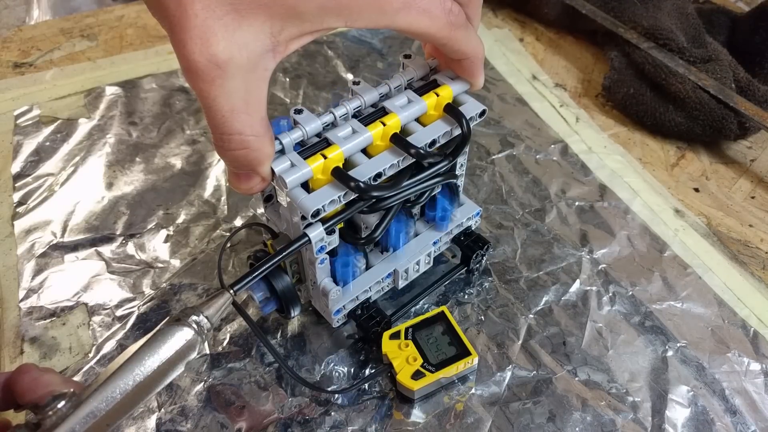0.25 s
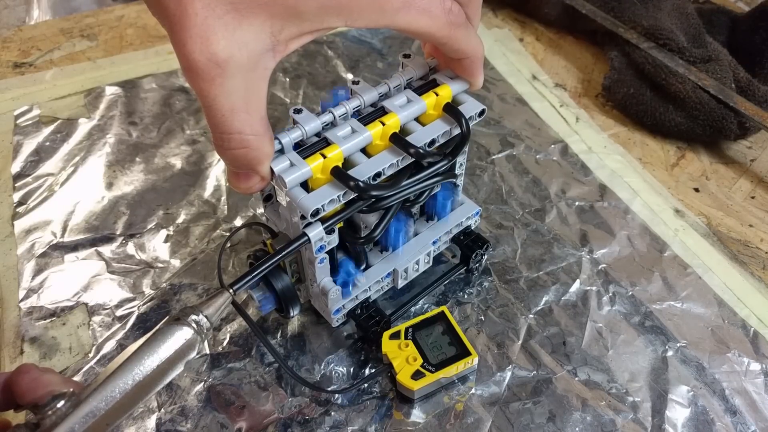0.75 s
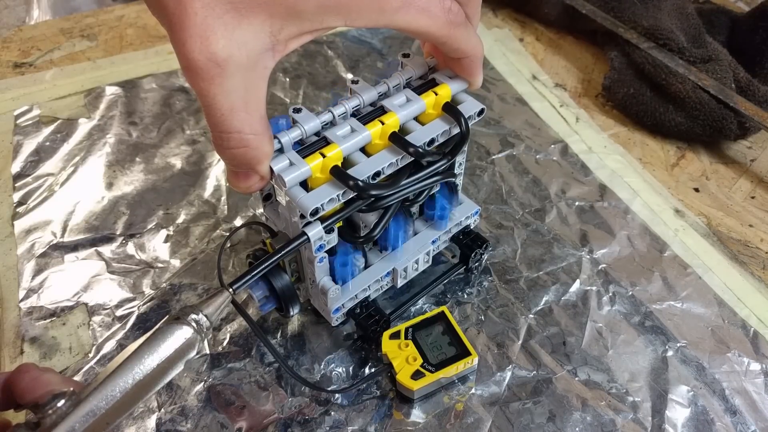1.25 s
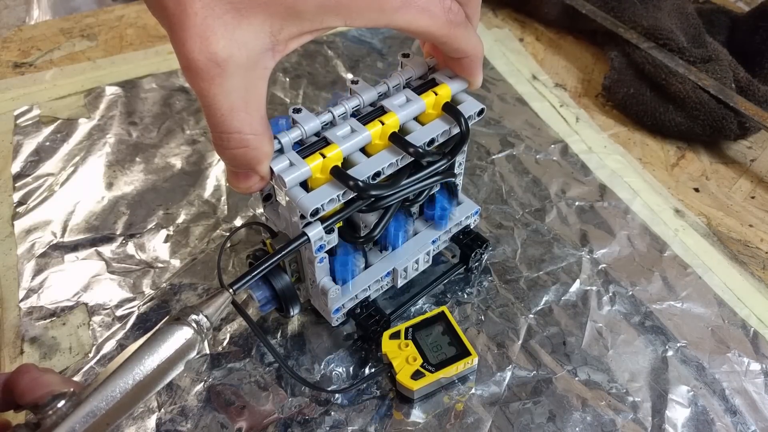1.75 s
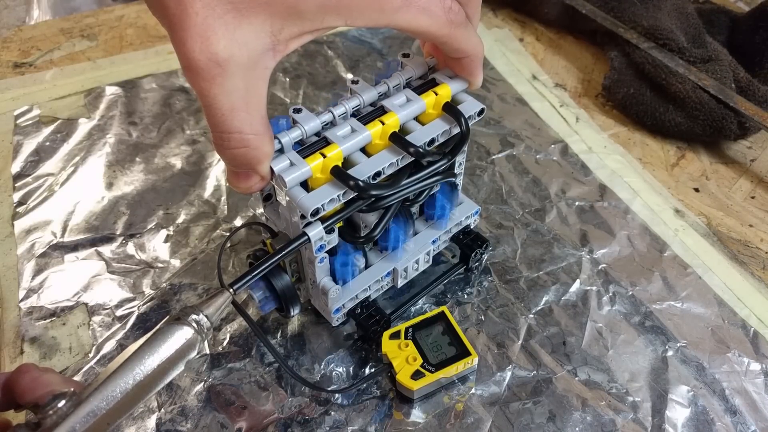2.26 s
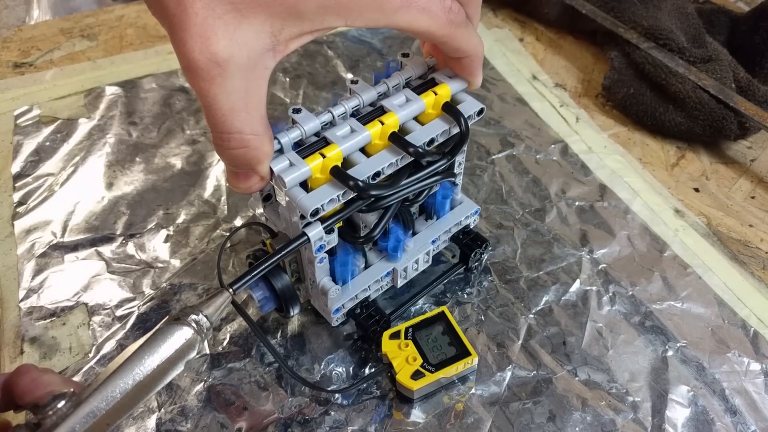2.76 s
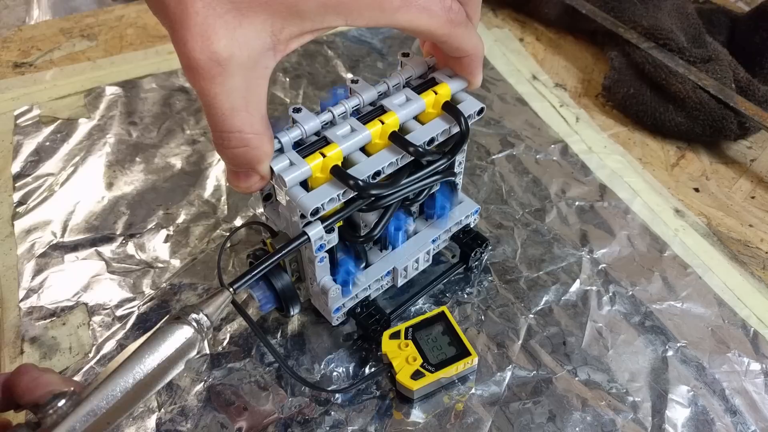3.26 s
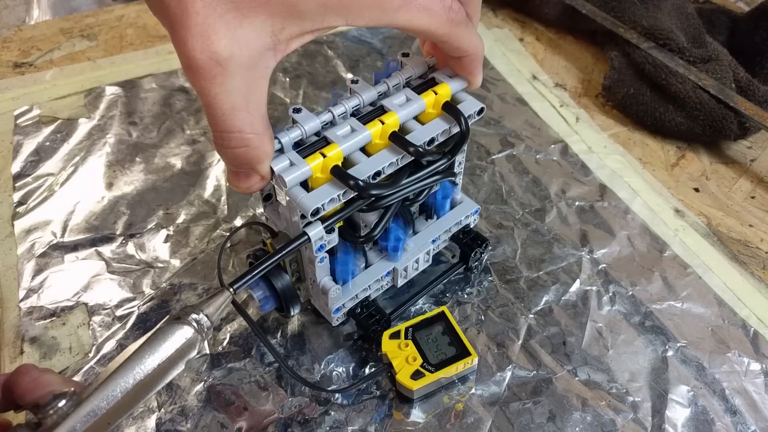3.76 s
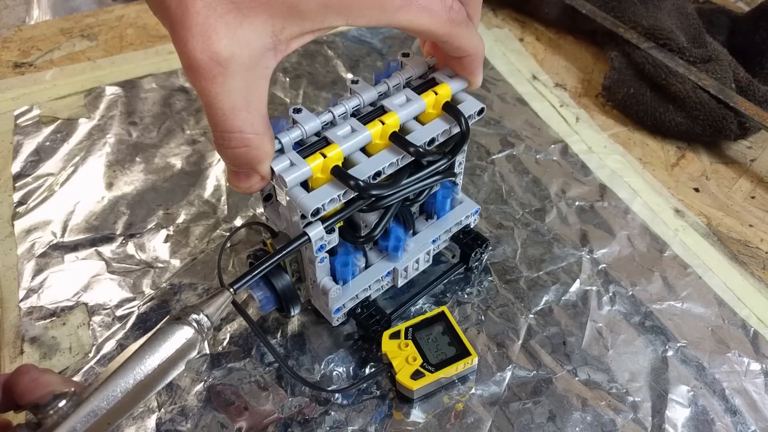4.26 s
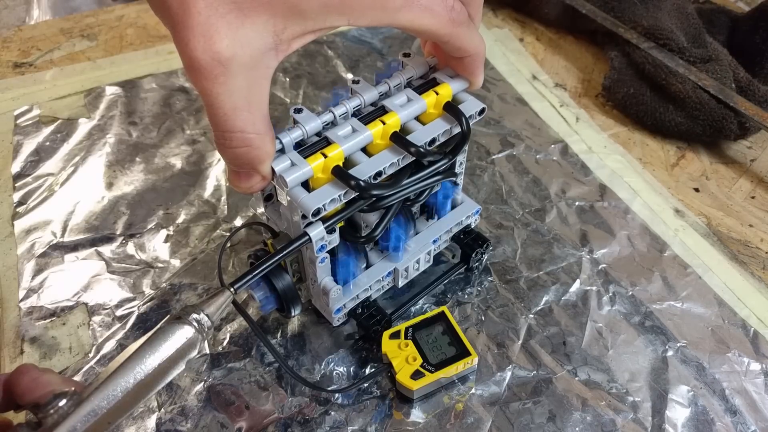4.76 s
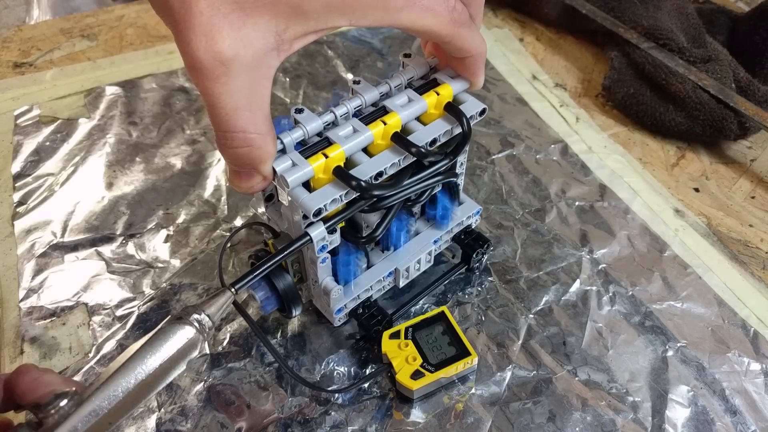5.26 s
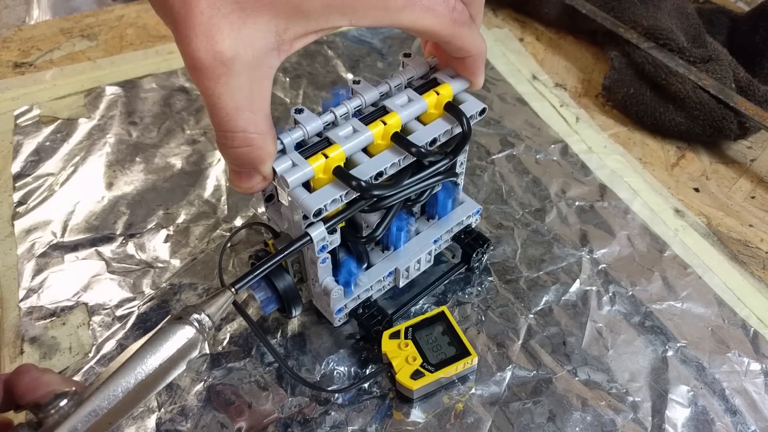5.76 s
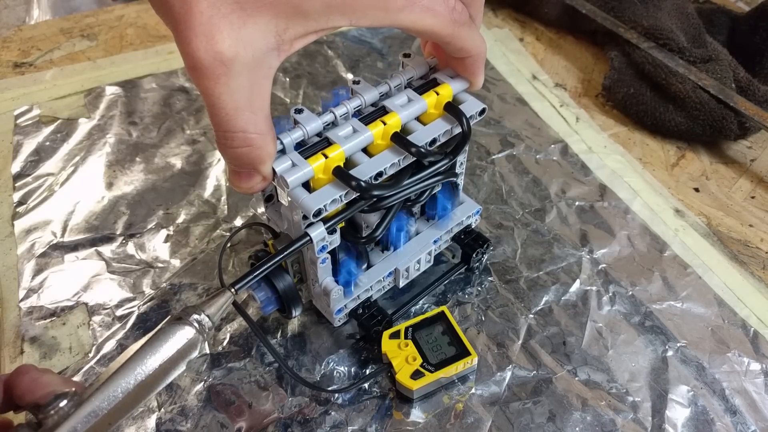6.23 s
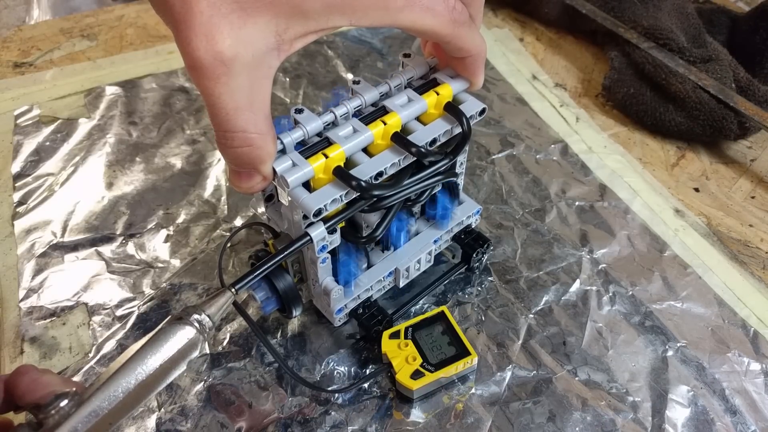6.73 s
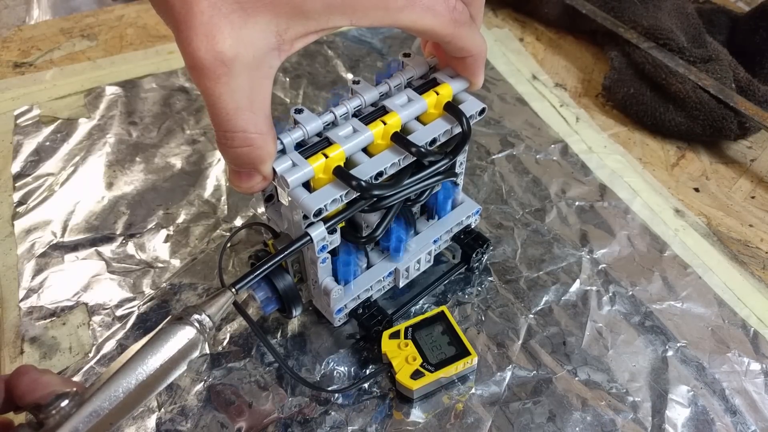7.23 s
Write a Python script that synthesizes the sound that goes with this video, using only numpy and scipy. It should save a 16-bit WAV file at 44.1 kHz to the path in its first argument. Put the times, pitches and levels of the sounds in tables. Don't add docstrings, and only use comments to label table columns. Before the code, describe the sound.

From 0 s a small three-cylinder toy air engine of plastic bricks is already spinning at about 19 turns per second, heard very close on a foil-covered board indoors. Loudest is sharp, gritty compressed-air hiss, strongest around 5 to 7 kHz, chopped into rapid puffs of differing colour, several per turn, so it flutters and whirs. Valve levers tick brightly every turn, and harder snaps jump out irregularly, for example near 0, 1, 1.7, 2.2, 3.2 to 3.5, 4.3 and 5.4 s. Much quieter, rods and cams knock the plastic frame in a fast rattle, and board and frame hum with a wavering low buzz. Speed climbs smoothly to about 21 turns by 3 s, 23 by 5 s and 25 at 7.5 s; hiss grows slightly louder and brighter, partly swallowing the ticks. Short reflections and faint room wash surround it. It ends still running, without slowing.

```python
import sys
import numpy as np
from scipy import signal
from scipy.io import wavfile
from scipy.ndimage import uniform_filter1d

SR = 44100
rng = np.random.default_rng(int(sys.argv[2]) if len(sys.argv) > 2 else 0)


def unload_audio(sound):
    columns = np.transpose(np.atleast_2d(sound))
    steps = np.round(np.clip(columns, -1, 1) * 32767)
    wavfile.write(sys.argv[1], SR, steps.astype(np.int16))


def gain_from_db(level_db):
    decades = np.asarray(level_db, float) / 20
    return 10 ** decades


N = 330309

# time in [s], speed in [turns per s].
CRANK_SPEED = [(0, 18.838), (0.9, 19.419), (1.5, 19.838), (2.1, 20.233), (2.7, 20.489), (3.0, 20.73),
               (3.9, 21.606), (4.5, 22.172), (4.8, 22.714), (5.1, 23.119), (5.4, 23.212), (5.7, 23.431),
               (6.3, 24.054), (7.49, 25.344)]
START_TURN, MID_SPEED = 0.022, 22

# level at MID_SPEED in [dB], rise in [dB per doubling].
AIR_LEVEL = (-17.5, 7.2)
# level at MID_SPEED in [dB], rise in [dB per doubling].
AIR_TREBLE = (-0.5, 2.7)
DULL_START_DB, DULL_START_S = -2, 0.035
# frequency in [Hz], level in [dB per Hz].
JET_COLOUR = [(1120, -58), (1900, -27.5), (2590, -19), (3560, -9.5), (4440, -13.5), (4890, -10),
              (5390, -2.5), (6050, 0.5), (7160, -5), (9670, -19), (11500, -19), (15700, -24)]
# crank angle in [turns], half width in [turns], centre in [Hz],
# level in [dB over the mean].
EXHAUST_PUFFS = [(.089, 0.056, 2000, -1), (.128, 0.044, 9100, 3), (.256, 0.057, 4170, 0.5),
                 (.272, 0.065, 15300, 3.5), (.391, 0.017, 8400, -2), (.448, 0.078, 3290, -2.5),
                 (.473, 0.039, 11700, 0), (.612, .071, 2000, -0.7), (.613, 0.068, 13450, 0.8),
                 (.75, 0.058, 8600, -2), (.794, 0.021, 6410, 2), (.803, 0.085, 3800, -1.8),
                 (.814, 0.073, 14680, -5), (.93, 0.067, 12100, -2), (.962, 0.04, 2380, -2.1)]
PUFF_SPREAD_HZ, LEAK_DB = 4200, -1.5
# crank angle in [turns], centre in [Hz], level in [dB over the mean].
WHISTLING_PORTS = [(.047, 9000, 1), (.055, 15200, 1), (.223, 11950, 7), (.225, 5800, 9), (.31, 2300, -3),
                   (.373, 9000, 0), (.575, 6600, 6), (.575, 13260, -.4), (.125, 11900, 3),
                   (.653, 6600, 1.5), (.689, 7550, 6), (.785, 13500, 4.1)]
PORT_TURNS, PORT_SPREAD = 0.02, 0.064

# crank angle in [turns],
# ring in [Hz], # length in [cycles], level in [dB], angle spread in [turns].
CRANK_TICKS = [
    (.225, 5950, 9, 6, .007),
    (.8, 6500, 7, 5.5, .007),
    (.575, 6500, 7, 3, .008),
    (.24, 3650, 8, -2, .014),
    (.8, 3200, 6, -3.5, .008),
    (.225, 11700, 16, -7, .008),
    (.12, 11600, 20, -10, .02),
    (.14, 1500, 3, -20, .003),
    (.79, 1900, 4, -20, .004),
]
TICK_FADE_DB = -5
# time in [s], level in [dB over the hiss].
HARD_SNAPS = [(0.0107, 12.2), (0.2219, 9.6), (0.5888, 9.7), (0.8992, 10.0), (1.0199, 10.9), (1.7112, 11.8),
              (1.9113, 10.6), (2.0102, 9.8), (2.208, 11.6), (2.3552, 9.5), (2.5028, 10.2), (2.796, 9.9),
              (2.872, 9.5), (3.1505, 9.3), (3.2296, 12.1), (3.2772, 10.4), (3.4197, 11.8), (3.4467, 10.0),
              (3.4669, 9.8), (3.7286, 10.8), (3.775, 9.3), (3.9143, 9.8), (4.0065, 9.8), (4.3463, 11.3),
              (4.687, 10.0), (5.3548, 10.1), (5.4018, 10.2), (5.7409, 9.1), (7.002, 9.5), (7.4797, 10.0)]

# crank angle in [turns], level in [dB].
ROD_KNOCKS = [
    (.055, 1.5),
    (0.141, 5.5),
    (0.25, -19),
    (.33, 4.5),
    (0.421, -10.5),
    (.49, -0.5),
    (0.602, 0.5),
    (0.679, -6),
    (.78, 4),
    (0.918, -2),
]
# level at MID_SPEED in [dB], rise in [dB per doubling].
KNOCK_LEVEL = (-43.5, 5)
# frequency in [Hz], level in [dB per Hz].
BODY_COLOUR = [(150, -24.5), (230, -1.5), (330, -1.5), (410, -15.5), (500, -2.5), (850, 0.5), (1050, -2),
               (1250, -0.5), (1600, 1), (2100, -2.5), (2800, 0), (3600, 5), (4300, 3), (6000, -32)]

# frequency in [Hz], width in [Hz], level in [dB].
BOARD_RESONANCES = [(48.6, 2.9, 11), (56.8, 7.5, 6.5), (76.95, 2.6, 5.5), (97, 2.5, -6), (132.2, 5.6, -1.5),
                    (150.3, 8.6, -2.5), (189.2, 2.8, 0.7), (232, 12.8, 2.5), (245.4, 12.8, 8.5)]
# shaft order in [multiples of crank speed], level in [dB].
BOARD_DRIVE = [(2, -65.1), (3, -39.7), (4, -49.7), (5, -46.8), (6, -38.0), (7, -55.3), (8, -47.0),
               (9, -50.4), (10, -58.9)]
# frequency in [Hz], width in [Hz], level in [dB].
FRAME_RESONANCES = [(273, 12, -10.5), (411, 22.4, -4.5), (445, 32, -6.5), (555.0, 9.9, 0.8),
                    (573, 15, -3.5), (631, 20, -4.5), (726, 17, -3.5), (852, 21, 4.3), (1137, 16, 3),
                    (1254, 19, 5.5), (1390, 27, 2), (1557, 31, 8)]
# shaft order in [multiples of crank speed], level in [dB].
FRAME_DRIVE = [(11, -50.5), (12, -51), (13, -45.5), (14, -49), (16, -47), (17, -50.5), (18, -54),
               (19, -49.5), (20, -52), (21, -50.5), (22, -54), (23, -55), (24, -56), (26, -57), (27, -54),
               (29, -59), (31, -51.5), (32, -51.5), (33, -57), (35, -54), (36, -57.5), (43, -56), (48, -57),
               (50, -58), (51, -56), (55, -60), (56, -58), (58, -60), (64, -60.5), (68, -59.5)]
NODE_HZ, NODE_WIDTH_HZ = 68, 1.27

# frequency in [Hz], level in [dB per Hz].
ROOM_COLOUR = [(30, -2), (70, -12), (200, 0.5), (600, -2), (1500, -7), (3000, -20), (6000, -27)]
EDGE_HZ = 15785


def valves(turns):
    return gain_from_db(with_speed(*AIR_LEVEL)) * evened(puffing_air(turns) + crank_ticks(turns) + hard_snaps())


def puffing_air(turns):
    contrast_db, waver_db, slack_turns = 5.0, 1.1, 0.003
    count = int(turns[-1]) + 2
    jet = gritty_jet()
    hz, t, spectrum = signal.stft(jet, SR, nperseg=64, noverlap=48)
    crank_at = np.interp(t * SR, np.arange(N), turns)

    puffs = [(a, width, f, PUFF_SPREAD_HZ, db) for a, width, f, db in EXHAUST_PUFFS]
    ports = [(a, PORT_TURNS, f, PORT_SPREAD * f, db) for a, f, db in WHISTLING_PORTS]
    parts = [(a, 0.012, 2200 + 13000 * f, 550, -4.5 + 5.9 * g) for a, f, g in rng.random((60, 3))]

    swells, colours = [], []
    for angle, width, centre_hz, spread_hz, db in puffs + ports + parts:
        strong, late = np.clip(rng.standard_normal((2, count)), -2, 2)
        turn = np.clip(np.round(crank_at - angle), 0, count - 1).astype(int)
        away = (crank_at - angle - turn - slack_turns * late[turn]) / width
        puff_power = gain_from_db(2 * (db + contrast_db + waver_db * strong[turn]))
        swells.append(np.exp(-away ** 2) * puff_power)
        colours.append(np.exp(-((hz - centre_hz) / spread_hz) ** 2))
    power = gain_from_db(2 * LEAK_DB) + np.transpose(colours) @ swells
    power /= power.mean(1, keepdims=True)

    starting = np.arange(N) < DULL_START_S * SR
    treble_db = with_speed(*AIR_TREBLE) + DULL_START_DB * starting
    power[hz > 8400] *= gain_from_db(2 * np.interp(t * SR, np.arange(N), treble_db))
    return signal.istft(spectrum * np.sqrt(power), SR, nperseg=64, noverlap=48)[1][:N]


def gritty_jet():
    grit_per_s, grit_db, spread_db = 2500, -9.0, 1.5
    sizes = gain_from_db(spread_db * np.minimum(rng.exponential(1, N), 3))
    grit = sizes * rng.choice([-1., 1.], N) * (rng.random(N) < grit_per_s / SR)
    hiss = rng.standard_normal(N)
    return evened(coloured(hiss + gain_from_db(grit_db) * evened(grit), JET_COLOUR))


def crank_ticks(turns):
    spread_db = 1.8
    count = int(turns[-1]) + 2
    fading = gain_from_db(with_speed(0, TICK_FADE_DB))
    out = np.zeros(N)
    for angle, ring_hz, cycles, db, loose in CRANK_TICKS:
        late, strong = np.clip(rng.standard_normal((2, count)), -2, 2)
        pulses = once_a_turn(turns, angle + loose * late, gain_from_db(db + spread_db * strong))
        out += fading * ring(pulses, ring_hz, cycles)
    return out


def hard_snaps():
    s, db = np.transpose(HARD_SNAPS)
    pulses = np.zeros(N)
    pulses[(s * SR).astype(int)] = gain_from_db(db + 5.0)
    return ring(pulses, 6100, 8)


def knocks(turns):
    slack_turns, spread_db, drift_db, t60_s = 0.00079, 0.17, 2.0, 0.12
    count = int(turns[-1]) + 2
    t = np.arange(6000) / SR
    out = np.zeros(N)
    for angle, db in ROD_KNOCKS:
        paths = rng.standard_normal((2, len(t))) * gain_from_db(-60 * t / t60_s)
        late, hard, slow, share = rng.standard_normal((4, count))
        late = evened(uniform_filter1d(late, size=3))
        slow = evened(uniform_filter1d(slow, size=30))
        share = evened(uniform_filter1d(share, size=30))
        sizes = gain_from_db(db + spread_db * hard + drift_db * slow)
        for path, part in zip(paths, (np.cos(0.73 * share), np.sin(0.78 * share))):
            blows = once_a_turn(turns, angle + slack_turns * late, sizes * part)
            out += signal.oaconvolve(blows, path)[:N]
    out = coloured(out, BODY_COLOUR)
    level = np.sqrt(uniform_filter1d(out ** 2, size=SR))
    return gain_from_db(with_speed(*KNOCK_LEVEL) + 6.0) * out / level


def hum(turns):
    board = shaft_orders(turns, BOARD_DRIVE, BOARD_RESONANCES, with_speed(0.1, -1.5), wobble_db=0.4)
    frame = shaft_orders(turns, FRAME_DRIVE, FRAME_RESONANCES, with_speed(-0.6, 11.6), wobble_db=1.85)
    return board + frame


def shaft_orders(turns, orders, modes, level_db, wobble_db):
    step = 256
    speed = curve(CRANK_SPEED)[0][::step]
    out = np.zeros(N)
    for order, db in orders:
        hz = order * speed
        power = sum(gain_from_db(2 * top_db) / (1 + (2 * (hz - mode_hz) / width) ** 2)
                    for mode_hz, width, top_db in modes)
        from_node = (hz - NODE_HZ) ** 2
        power *= from_node / (from_node + NODE_WIDTH_HZ ** 2)
        wobble = uniform_filter1d(rng.standard_normal(len(hz)), size=20)
        wobble = evened(uniform_filter1d(wobble, size=12))
        gain = np.sqrt(2 * power) * gain_from_db(wobble_db * wobble)
        gain = np.interp(np.arange(N), np.arange(0, N, step), gain)
        out += gain_from_db(db) * gain * np.sin(2 * np.pi * (order * turns + rng.random()))
    return out * gain_from_db(level_db)


def echoes(x):
    wet_db, t60_s = -13, 0.07
    t = np.arange(40, 3000) / SR
    taps = rng.standard_normal(len(t)) * (rng.random(len(t)) < 0.08) * gain_from_db(-60 * t / t60_s)
    both = np.r_[1, np.zeros(39), gain_from_db(wet_db) * taps / np.linalg.norm(taps)]
    return signal.oaconvolve(x, both / np.linalg.norm(both))[:N]


def room_wash():
    return gain_from_db(-57.0) * evened(coloured(rng.standard_normal(N), ROOM_COLOUR))


def crank():
    return START_TURN + np.cumsum(curve(CRANK_SPEED)[0]) / SR


def with_speed(mid_db, per_doubling_db):
    return mid_db + per_doubling_db * np.log2(curve(CRANK_SPEED)[0] / MID_SPEED)


def once_a_turn(turns, angle, sizes):
    at = np.interp(np.arange(len(sizes)) + angle, turns, np.arange(N), left=-99, right=-99)
    near = np.round(at).astype(int)[:, None] + np.arange(-8, 9)
    away = near - at[:, None]
    pulse = np.sinc(away) * np.cos(np.pi * away / 18) ** 2
    out = np.zeros(N + 200)
    np.add.at(out, near + 150, sizes[:, None] * pulse)
    return out[150:N + 150]


def ring(pulses, hz, cycles):
    u = np.arange(0, 1, hz / cycles / SR)
    burst = np.sin(np.pi * u ** 0.77) ** 2 * np.sin(2 * np.pi * cycles * u)
    return signal.oaconvolve(pulses, burst, "same")


def coloured(x, points):
    f, db = np.transpose(points)
    hz = abs(np.fft.fftfreq(4096, 1 / SR))
    log_gain = np.interp(np.log(hz + 1), np.log(f + 1), np.maximum(db, -70)) * np.log(10) / 20
    taps = np.fft.ifft(np.exp(log_gain - 1j * signal.hilbert(log_gain).imag)).real[:2048]
    return signal.oaconvolve(x, taps / np.linalg.norm(taps))[:N]


def curve(rows):
    s, *columns = np.transpose(rows)
    return [np.interp(np.arange(N) / SR, s, c) for c in columns]


def evened(x):
    return x / np.sqrt(np.mean(x ** 2) + 1e-20)


def scene():
    turns = crank()
    engine = echoes(valves(turns) + knocks(turns))
    return (engine + hum(turns) + room_wash())[None]


def band_limit(x):
    return signal.sosfilt(signal.butter(12, 16590, fs=SR, output="sos"), x)


def record(dry):
    rounded = 0.85 * np.tanh(dry / 0.85)
    low_pass = signal.firwin(1023, EDGE_HZ, window=("kaiser", 9), fs=SR)
    mix = signal.oaconvolve(rounded, low_pass[None], "same")
    return band_limit(mix)


dry = scene()
out = record(dry)
unload_audio(out)
```